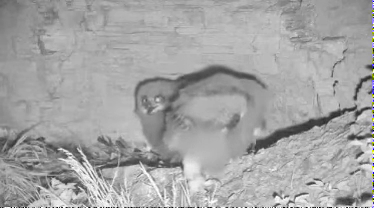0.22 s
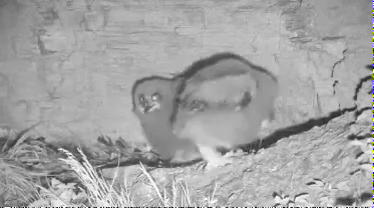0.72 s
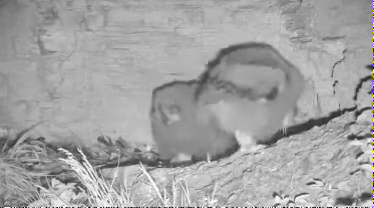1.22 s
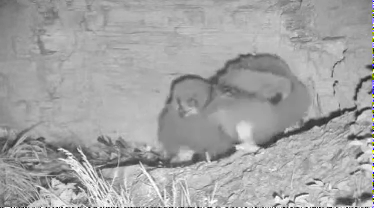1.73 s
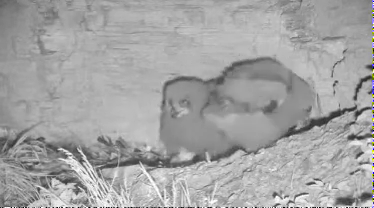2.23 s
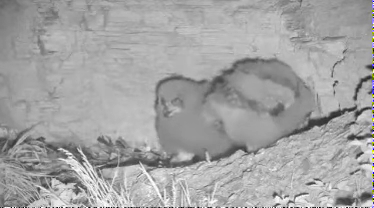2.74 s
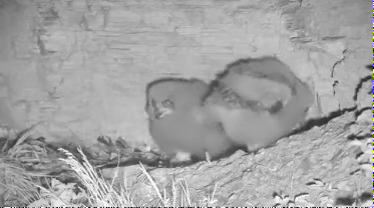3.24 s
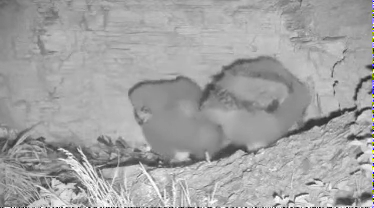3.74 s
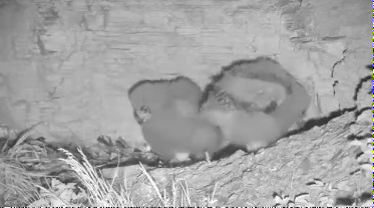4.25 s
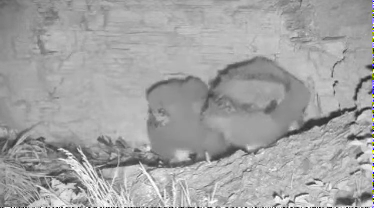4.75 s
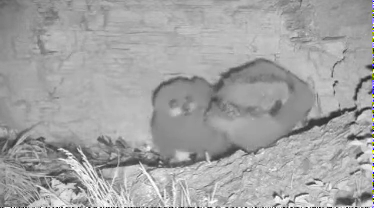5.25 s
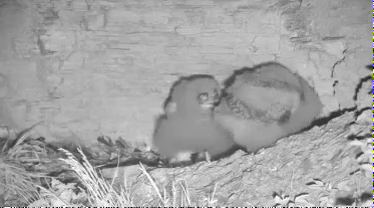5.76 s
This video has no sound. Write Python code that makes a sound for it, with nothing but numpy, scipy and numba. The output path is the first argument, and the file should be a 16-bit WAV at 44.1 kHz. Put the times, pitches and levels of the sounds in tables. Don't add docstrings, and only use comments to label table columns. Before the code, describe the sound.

Two owl chicks beg in turn, a gliding wheezy screech answered by a flat hoarse hiss, twice, after a small twig snap over faint whine.

```python
import sys
import numpy as np
from scipy import signal
from scipy.fft import rfft, irfft
from scipy.io import wavfile
from scipy.ndimage import uniform_filter1d
from numba import njit

SR = 44100
rng = np.random.default_rng(int(sys.argv[2]) if len(sys.argv) > 2 else 0)


def natural_amplitude(level_db):
    exponent = np.asarray(level_db, float) / 20
    return 10 ** exponent


def put_to_file(sound):
    columns = np.atleast_2d(sound).T
    safe = np.clip(columns, -1, 1)
    whole_steps = np.round(safe * 32767)
    wavfile.write(sys.argv[1], SR, whole_steps.astype(np.int16))


N = 266651
T = np.arange(N) / SR

# t/s, level/dB
WHEEZE_EFFORT = [
    [(.83, -77), (.87, -52), (.905, -34), (.96, -26.5), (1.01, -27), (1.04, -30.5), (1.1, -24),
     (1.185, -33), (1.225, -66.5)],
    [(3.365, -78), (3.385, -41.5), (3.44, -35), (3.5, -30.5), (3.55, -24.5), (3.6, -30), (3.68, -34.5),
     (3.74, -43), (3.79, -82.5)],
]
# t/s, f/Hz
THROAT = [
    [(.86, 2760), (.9, 3280), (.955, 3300), (.99, 3250), (1.035, 2792), (1.064, 3123), (1.09, 3690),
     (1.12, 3560), (1.19, 3440)],
    [(3.378, 2700), (3.412, 3500), (3.46, 3760), (3.5, 3700), (3.53, 3110), (3.563, 2780), (3.6, 3860),
     (3.65, 4020), (3.76, 3650)],
]
# beak resonance gain/dB, whistle share off it/0-1, share on it/0-1, treble/dB, voice level/dB re effort
WHEEZE_MIX = [
    (10, 0.5, .9, -28.5, -17),
    (4, 0.19, .8, -27.5, -20.5),
]
# f/Hz, width/Hz, level/dB
WHEEZE_BODY = [
    [(3050, 150, 0), (2750, 400, -12), (3400, 500, -10)],
    [(3050, 300, 0), (2700, 400, -6), (3350, 400, -3), (3750, 500, -5)],
]
# f/Hz, width/Hz, level/dB
WHEEZE_TREBLE = [
    [(4200, 730, 6.5), (5220, 880, -3.5), (5860, 1200, -8), (7000, 1500, -18.5), (1600, 700, -9)],
    [(4450, 440, 0), (5050, 850, 13), (5600, 450, -11.5), (6230, 300, -4), (7300, 1300, -7),
     (1310, 2600, 4)],
]
# f/Hz, width/Hz, level/dB
SQUEEZE = [
    [(4990, 220, -0.5), (5840, 300, -6.5)],
    [(5100, 340, -2.5), (4740, 270, -3)],
]
THROAT_WIDTH_HZ = [460, 630]
WHISTLE_WIDTH_HZ = [90, 140]
WHISTLE_LEAN = [0.085, 0.29]
BEAK_WIDTH_HZ = [176, 200]
SQUEEZE_DB = [-19, -25]
RIM_DB = [-14.5, -12]
GAPE_DB = [6.5, 5]
VOICE_HZ = [2428, 2370]
GLIDE_S, WHISTLE_HOLD_S = 0.011, 0.014
SQUEEZED_HZ, SQUEEZE_FADE_DB_KHZ = 2894, 21
THROAT_SHARE, THROAT_FADE_DB_KHZ = 0.9, 10.5
PURE_BELOW_HZ, PURE_WIDTH_HZ = 3540, 190
BEAK_HZ, RINGS_ABOVE_DB = 3070, -35
RIM_ABOVE_HZ, RIM_WIDTH_HZ = 110, 98
TREBLE_FOLLOW = 0.06
GAPE_S, GAPE_LEAD_S, GAPE_HOLD_S = 0.029, 0.027, 0.15
FULL_VOICE_DB, VOICE_SAG_HZ_DB, SIDE_SLACK = -36, 10, 0.44

# t/s, level/dB
HISS_EFFORT = [
    [(1.09, -80), (1.14, -37.5), (1.21, -33), (1.29, -27), (1.34, -25.5), (1.41, -36.5), (1.475, -33),
     (1.5, -47.5), (1.545, -94)],
    [(3.66, -71.5), (3.71, -37), (3.8, -36), (3.89, -31.5), (3.95, -34), (4.015, -38), (4.045, -43),
     (4.058, -56), (4.075, -92)],
]
# beak opens t/s, beak closes t/s, upper level/dB, chest level/dB re effort
HISS_BEAK = [
    (1.19, 1.445, -6, -25.5),
    (3.7, 3.998, -21.5, -32.5),
]
# f/Hz, width/Hz, level/dB
HISS_MIDDLE = [
    [(1750, 860, -17.5), (2544, 320, -10.5), (2965, 273, 7), (3320, 450, -20.5)],
    [(3090, 293, 12), (2760, 410, 4.5), (3377, 87, 5), (1687, 350, -18.5)],
]
# f/Hz, width/Hz, level/dB
HISS_UPPER = [
    [(3430, 270, -10.5), (3714, 220, 8), (4114, 430, -1.5), (4630, 670, -2.5), (5570, 760, -15.5),
     (6400, 970, -36.5), (7670, 1500, -26.5)],
    [(3920, 870, 11.5), (4300, 550, -5.5), (5250, 550, -1), (5850, 700, -12), (7940, 1200, -11.5)],
]
# f/Hz, width/Hz, level/dB
HISS_CHEST = [
    [(837, 106, 0)],
    [(752, 140, 0)],
]
BEAK_MOVE_S, BEAK_SHUT_DB = 0.0083, -12
UPPER_HOLD, CHEST_PUSH = 0.62, 0.95

# t/s, length/s, start f/Hz, end f/Hz, level/dB
SQUEAKS = [
    (0.821, .055, 1500, 2480, -65.5),
    (0.824, 0.048, 3200, 4200, -71.5),
    (1.484, 0.042, 2080, 1750, -54.5),
    (1.488, 0.038, 4000, 3550, -62),
    (3.359, 0.024, 3870, 4450, -59),
    (3.376, 0.019, 4850, 5600, -64),
    (3.735, 0.029, 2430, 2150, -45),
    (4.058, .028, 3530, 3360, -59),
]
# t/s, level/dB
CRACKS = [
    (.2671, -19),
    (.2696, -25),
    (.2733, -34),
    (.2776, -40),
]
# f/Hz, level/dB, t60/s
TWIG = [(723, -8, 0.026), (1000, -4, 0.027), (1280, -23, 0.011), (1750, -4.5, 0.026), (2030, -11, 0.012),
        (2430, -7, 0.0082), (2975, 0, 0.019), (3455, -1, 0.021), (3920, -8.5, 0.013), (4540, -7, .006),
        (5200, -11, .005), (6360, -10, 0.0028), (8550, -5, .003), (10500, -3, 0.0026)]
LEDGE_T60_S, LEDGE_DB = 0.56, -28

SHAFT_HZ, WHINE_SLOTS = 144.42, 20
WHINE_DB, WHINE_WOW = -56.5, 0.4
# multiple of the shaft, level/dB
FAN = [(5, -64.5), (8, -85), (16, -84), (17, -77.5), (22, -85), (23, -80.5)]
MAINS_HZ, HUM_WOBBLE_DB = 49.984, 0.3
# multiple of the mains, level/dB
HUM = [(1, -75), (2, -91.5), (4, -92), (6, -84.5), (8, -95.5)]
# f/Hz, level/dB
BUZZ = [(1500, -80.5), (2300, -86.5), (3350, -80.5), (4500, -83), (5500, -84.5), (6500, -92), (8000, -100),
        (11000, -112)]
BUZZ_SIDE_DB = [-3.5, -17.5]
# f/Hz, level/dB per Hz
FLOOR = [(20, -106), (60, -100), (150, -101), (400, -99), (900, -98.5), (2000, -98), (3500, -103),
         (5000, -107), (7000, -110), (10000, -114), (14000, -118), (15600, -122), (15800, -160)]
# f/Hz, width/Hz, level/dB rms
HOUSING = [(1668, 133, -72), (2822, 260, -65), (3078, 310, -67.5), (2600, 6, -84.5), (3620, 17, -80.5)]


def wheezer():
    out = np.zeros(N)
    for i, (beak_db, pure_off, pure_on, treble_db, voice_db) in enumerate(WHEEZE_MIX):
        span, db = curve(WHEEZE_EFFORT[i])
        throat_hz = uniform_filter1d(curve(THROAT[i], span)[1], int(GLIDE_S * SR))
        opening_khz = np.abs(throat_hz - SQUEEZED_HZ) / 1000
        air = breath(len(db), flutter_db=-1.0, rate=150)

        throat = even(steep(air, throat_hz, THROAT_WIDTH_HZ[i]), 0.061)
        fill = even(ring(svf(air, 0.93 * throat_hz, 1200.0), WHEEZE_BODY[i]), 0.19)
        share = np.clip(THROAT_SHARE * natural_amplitude(-2 * THROAT_FADE_DB_KHZ * opening_khz), 0, 0.96)
        rasp = np.sqrt(share) * throat + np.sqrt(1 - share) * fill

        clearing = step((PURE_BELOW_HZ - throat_hz) / PURE_WIDTH_HZ)
        pure = np.clip(pure_off + (pure_on - pure_off) * clearing, 0, 0.95)
        line_hz = throat_hz - (1 - WHISTLE_LEAN[i]) * np.maximum(throat_hz - BEAK_HZ, 0)
        whistle = steep(rng.standard_normal(len(db)), line_hz, WHISTLE_WIDTH_HZ[i])
        whistle = even(whistle, WHISTLE_HOLD_S)
        call = even(np.sqrt(pure) * whistle + np.sqrt(1 - pure) * rasp, WHISTLE_HOLD_S)

        on_beak = np.exp(-((throat_hz - BEAK_HZ) / BEAK_WIDTH_HZ[i]) ** 2)
        call = call * natural_amplitude(beak_db * step((db - RINGS_ABOVE_DB) / 3) * on_beak)
        call += natural_amplitude(SQUEEZE_DB[i] - SQUEEZE_FADE_DB_KHZ * opening_khz) * ring(air, SQUEEZE[i])
        call += natural_amplitude(RIM_DB[i]) * steep(air, throat_hz + RIM_ABOVE_HZ, RIM_WIDTH_HZ)

        squeezed_s = min(THROAT[i][1:], key=lambda point: point[1])[0]
        since_s = T[span] - squeezed_s
        gape = step((since_s + GAPE_LEAD_S) / GAPE_S) * step((GAPE_HOLD_S - since_s) / GAPE_S)
        bend = (throat_hz / 3400) ** TREBLE_FOLLOW
        treble = [(hz * bend, width, gain_db) for hz, width, gain_db in WHEEZE_TREBLE[i]]
        weak_db = np.maximum(FULL_VOICE_DB - db, 0)
        sides = natural_amplitude(voice_db) * steep(air, VOICE_HZ[i] - VOICE_SAG_HZ_DB * weak_db, 140)
        sides += natural_amplitude(treble_db + GAPE_DB[i] * gape) * ring(air, treble)
        out[span] += natural_amplitude(db) * (call + natural_amplitude(SIDE_SLACK * weak_db) * sides)
    return out


def hisser():
    out = np.zeros(N)
    for i, (opens_s, closes_s, upper_db, chest_db) in enumerate(HISS_BEAK):
        span, db = curve(HISS_EFFORT[i])
        slack_db = np.minimum(db.max() - db, 10)
        shut = step((opens_s - T[span]) / BEAK_MOVE_S)
        shut += step((T[span] - closes_s) / BEAK_MOVE_S / 2)
        air = breath(len(db), flutter_db=0.0, rate=130)
        call = even(ring(air, HISS_MIDDLE[i]), 0.11)
        call += natural_amplitude(upper_db + UPPER_HOLD * slack_db + BEAK_SHUT_DB * shut) * ring(air, HISS_UPPER[i])
        call += natural_amplitude(chest_db - CHEST_PUSH * slack_db) * ring(air, HISS_CHEST[i])
        out[span] += natural_amplitude(db) * call
    return out


def squeaks():
    out = np.zeros(N)
    for s, length_s, from_hz, to_hz, db in SQUEAKS:
        n = int(length_s * SR)
        hz = np.linspace(from_hz, to_hz, n) * (1 + 0.02 * walk(300, n))
        phase = 2 * np.pi * np.cumsum(hz) / SR
        out[int(s * SR):][:n] += natural_amplitude(db + 3.0 * walk(220, n)) * np.hanning(n) * np.sin(phase)
    return out


def twig():
    t, cracks = T[:SR // 10], np.zeros(N)
    hz, db, t60 = (column[:, None] for column in np.transpose(TWIG))
    side = np.where(hz < 1500, 1, (-1.) ** np.arange(len(hz))[:, None])
    decay = np.exp(-np.log(1000) * t / t60)
    modes = np.sum(-side * natural_amplitude(db) * np.sin(2 * np.pi * hz * t) * decay, axis=0)
    for s, crack_db in CRACKS:
        cracks[int(s * SR)] = natural_amplitude(crack_db)
    air_path = signal.butter(3, [520, 5600], "band", fs=SR, output="sos")
    return signal.sosfilt(air_path, natural_amplitude(-9.0) * signal.fftconvolve(cracks, modes)[:N])


def ledge(x):
    t = T[:SR // 2]
    tail = svf(rng.standard_normal(len(t)), np.full(len(t), 2900.), 770.0)
    tail *= np.exp(-np.log(1000) * t / LEDGE_T60_S) * (t > 0.004)
    return x + natural_amplitude(LEDGE_DB) * signal.fftconvolve(x, tail / np.linalg.norm(tail))[:N]


def fan():
    turn = 2 * np.pi * SHAFT_HZ * T
    level = np.sqrt(2) * natural_amplitude(WHINE_DB + 0.43 * walk(11.0, N))
    whine = level * np.sin(WHINE_SLOTS * turn + WHINE_WOW * np.sin(turn))
    return tones(SHAFT_HZ, FAN, wobble_db=1.0) + whine


def hum():
    return tones(MAINS_HZ, HUM, wobble_db=HUM_WOBBLE_DB)


def buzz():
    order = np.arange(31, 221, 2)
    hz, db = np.transpose(BUZZ)
    comb_db = np.choose(order % 6 // 2, [0, BUZZ_SIDE_DB[1], BUZZ_SIDE_DB[0]])
    level_db = np.interp(np.log(order * MAINS_HZ), np.log(hz), db) + comb_db
    turn = np.arange(4097) / 4096
    cycle = np.sqrt(2) * natural_amplitude(level_db) @ np.cos(2 * np.pi * np.outer(order, turn))
    return np.interp((T * MAINS_HZ + 0.42) % 1, turn, cycle) * natural_amplitude(2.7 * walk(90, N))


def hiss():
    hz, db = np.transpose(FLOOR)
    f = np.arange(N // 2 + 1) * SR / N + 1
    spectrum = rfft(rng.standard_normal(N)) * natural_amplitude(np.interp(np.log(f), np.log(hz), db))
    out = irfft(spectrum, N) * np.sqrt(SR / 2)
    for hz, width, db in HOUSING:
        out += natural_amplitude(db + 0.24 * walk(5.7, N)) * steep(rng.standard_normal(N), hz, width)
    return out


def tones(hz, lines, wobble_db):
    out = np.zeros(N)
    for k, db in lines:
        level = np.sqrt(2) * natural_amplitude(db + wobble_db * walk(4.1, N))
        out += level * np.sin(2 * np.pi * (round(k) * hz * T + rng.random()))
    return out


def breath(size, flutter_db, rate):
    return unit(rng.standard_normal(size) * natural_amplitude(flutter_db * walk(rate, size)))


@njit
def svf(x, hz, width):
    y, b, l = np.empty(len(x)), 0., 0.
    for i in range(len(x)):
        g, k = np.tan(np.pi * hz[i] / SR), width / hz[i]
        v = (b + g * (x[i] - l)) / (1 + g * (g + k))
        b, l, y[i] = 2 * v - b, l + 2 * g * v, k * v
    return y


def steep(x, hz, width):
    hz = hz * np.ones(len(x))
    for _ in range(3):
        x = svf(x, hz, 1.42 * width)
    return unit(x)


def ring(x, peaks):
    out = np.zeros(len(x))
    for k, (hz, width, db) in enumerate(peaks):
        out += (-1) ** k * natural_amplitude(db) * steep(x, hz, width)
    return unit(out)


def walk(rate, size):
    k = int(SR / rate)
    held = np.repeat(rng.standard_normal(size // k + 1), k)
    return unit(uniform_filter1d(uniform_filter1d(held, k), k)[:size])


def even(x, s):
    power = uniform_filter1d(uniform_filter1d(x ** 2, int(s * SR)), size=40)
    return x / np.sqrt(power + 1e-9)


def unit(x):
    return x / np.sqrt(np.mean(x ** 2))


def curve(rows, span=None):
    s, value = np.transpose(rows)
    span = span or slice(int(s[0] * SR), int(s[-1] * SR))
    return span, np.interp(T[span], s, value)


def step(x):
    return 0.5 + 0.5 * np.tanh(x)


def scene():
    near = ledge(wheezer() + hisser() + squeaks() + twig())
    camera = fan() + hum() + buzz() + hiss()
    return (near + camera)[None]


def roll_off(x):
    return signal.sosfilt(signal.butter(12, 15640, fs=SR, output="sos"), x)


def record(dry):
    return roll_off(dry)


dry = scene()
out = record(dry)
put_to_file(out)
```